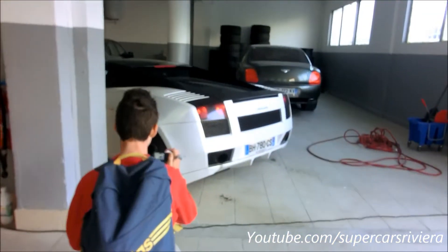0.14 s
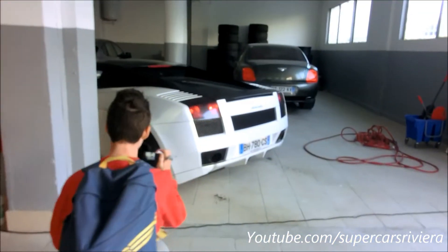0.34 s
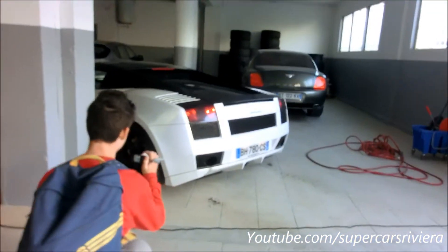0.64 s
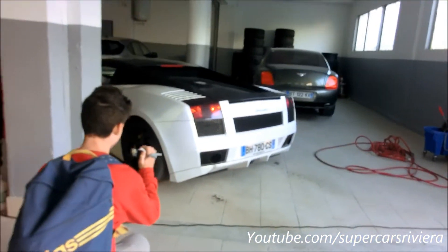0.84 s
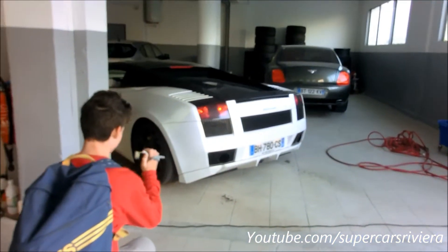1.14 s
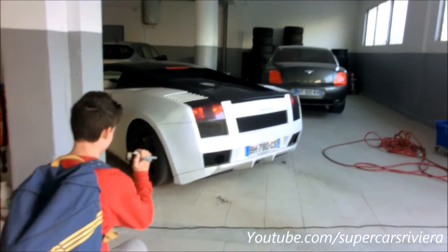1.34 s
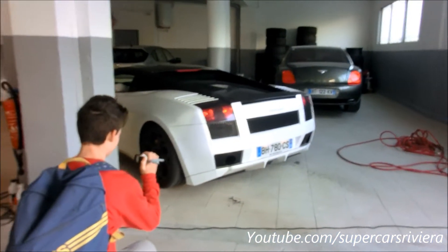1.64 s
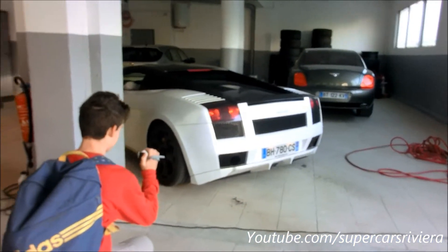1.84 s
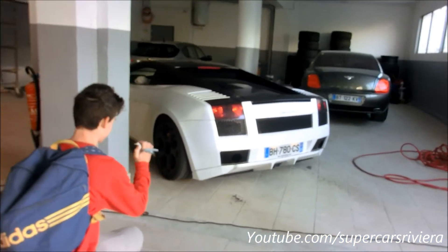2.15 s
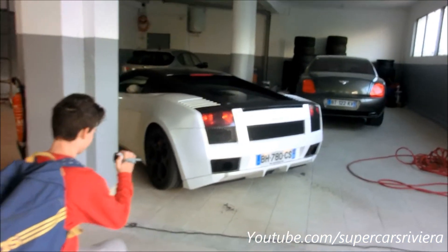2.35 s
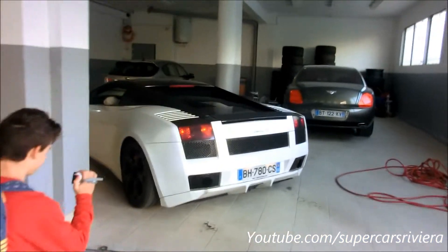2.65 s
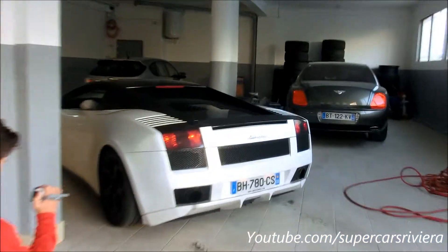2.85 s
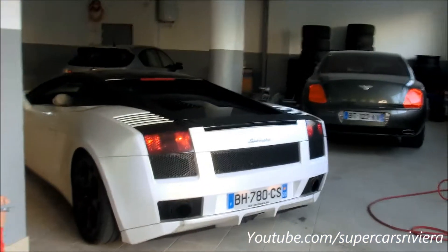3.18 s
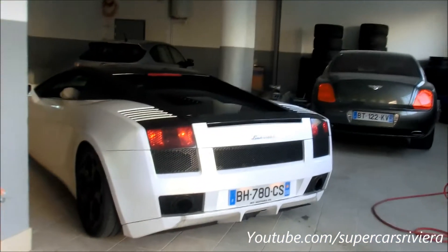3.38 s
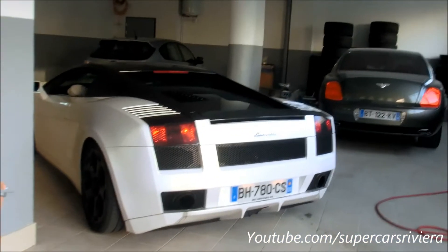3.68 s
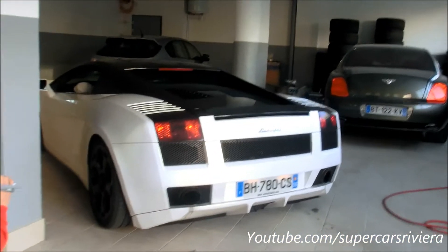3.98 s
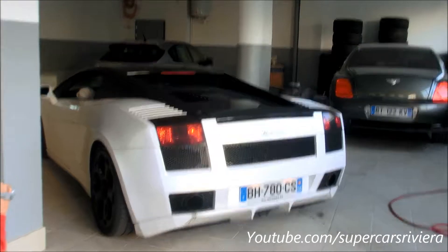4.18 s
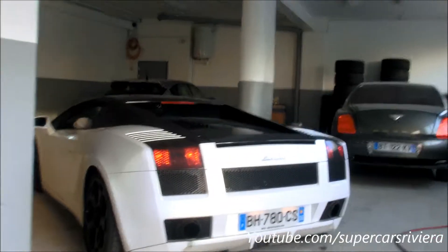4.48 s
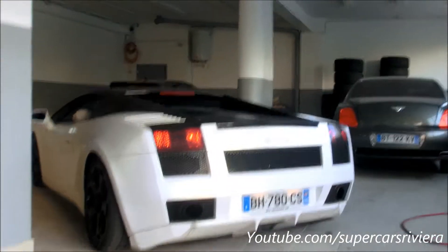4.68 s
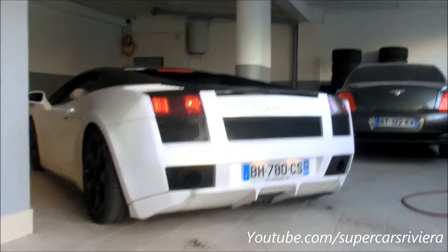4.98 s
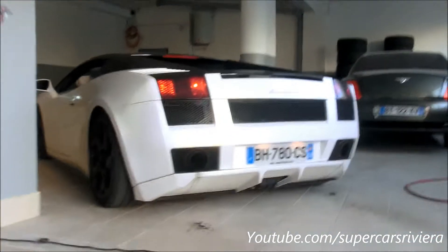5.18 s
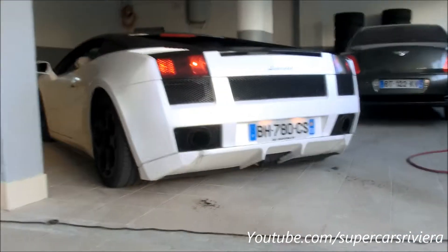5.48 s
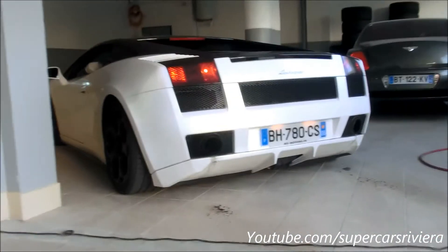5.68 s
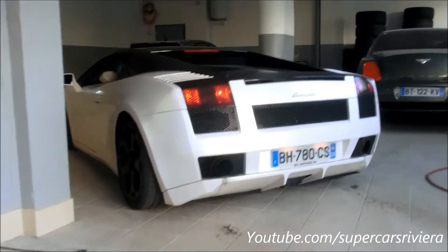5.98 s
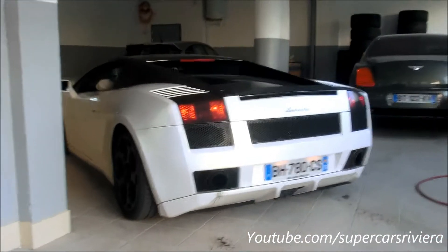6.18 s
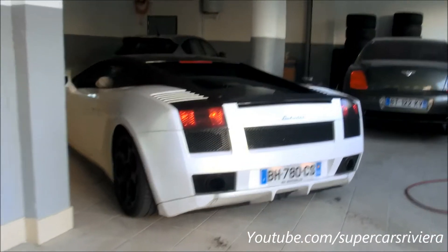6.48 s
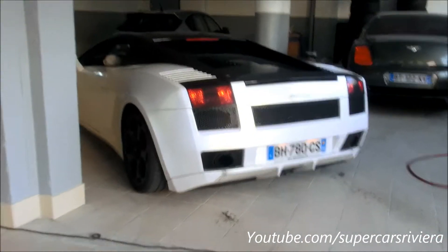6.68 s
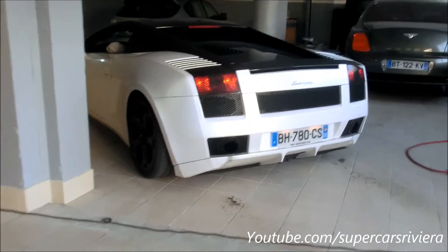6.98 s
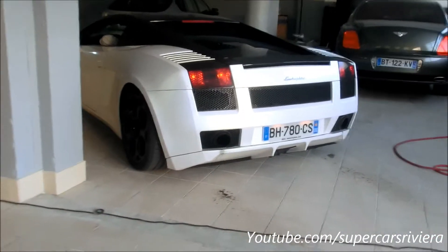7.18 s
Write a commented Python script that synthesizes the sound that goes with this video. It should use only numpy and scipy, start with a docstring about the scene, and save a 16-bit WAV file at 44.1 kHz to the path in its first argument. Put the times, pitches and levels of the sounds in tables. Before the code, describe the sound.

Deep exhaust burbles to life, drops to idle, then three throttle stabs grow louder and harsher, the last cut off high, echoing off hard walls.

```python
"""Ten-cylinder engine blipped in a tiled garage

The engine catches, flares, settles to idle and is blipped three times, popping in two places on the overrun.
Sine harmonics of the firing rate carry the exhaust note over a boom strongest near 190 Hz.
Pulsed noise makes the roar and hiss, steady noise the intake and deep rumble; tones and pops echo.
At the top of the last two blips the sound overloads the input stage, and a limiter holds it down."""
import sys
import numpy as np
from scipy import signal
from scipy.fft import rfft, irfft, next_fast_len
from scipy.io import wavfile
from scipy.ndimage import uniform_filter1d, minimum_filter1d, map_coordinates

SR = 44100
rng = np.random.default_rng(int(sys.argv[2]) if len(sys.argv) > 2 else 0)


def unload_wav(signal):
    """Save mono or channel-first audio to the path in sys.argv[1] as 16-bit WAV at rate SR, clipped to [-1, 1]."""
    wavfile.write(
        sys.argv[1],
        SR,
        np.round(np.clip(np.atleast_2d(signal).T, -1, 1) * 32767).astype(np.int16),
    )


N = 323253
IDLE_HZ = 75  # firing rate at idle


def amp(db):
    """dB to gain."""
    return 10 ** (np.asarray(db) / 20)


def unit(x):
    """Scaled to rms 1."""
    return x / np.sqrt(np.mean(x ** 2) + 1e-20)


def along(points, hz):
    """Value at hz of a curve through (Hz, value) points, on a log frequency axis."""
    f, v = np.transpose(points)
    return np.interp(np.log(hz + 1), np.log(f + 1), v)


def curve(rows):
    """One value per sample through (seconds, value) points."""
    s, values = np.transpose(rows)
    return np.interp(np.arange(N) / SR, s, values)


def wobble(rate):
    """A smooth random curve with rate knots a second."""
    knots = rng.standard_normal(int(N * rate / SR) + 4)
    return map_coordinates(knots, [np.arange(N) * rate / SR])


def lagged(x, lag_s):
    """x followed with a time constant in seconds."""
    keep = np.exp(-1 / (lag_s * SR))
    return signal.lfilter([1 - keep], [1, -keep], x - x[0]) + x[0]


def filtered(x, response):
    """x shaped by a complex response of frequency."""
    m = next_fast_len(N + SR // 2)
    return irfft(rfft(x, m) * response(np.fft.rfftfreq(m, 1 / SR)), m)[..., :N]


def spread(pair, spectrum):
    """Two signals coloured and mixed to left and right, rms 1; the treble is the widest."""
    # How much the two microphone ports differ.
    # Each row: frequency in Hz, left-minus-right over left-plus-right in dB.
    width_points = [(30, -25), (130, -29.5), (290, -24.5), (640, -20), (1410, -14.5), (3100, -8.5),
                    (6820, -4), (15000, -1.5)]

    def response(hz):
        turn = np.arctan(amp(along(width_points, hz)))
        return amp(along(spectrum, hz)) * np.array([np.cos(turn), np.sin(turn)])

    mid, side = filtered(pair, response)
    return unit(np.array([mid + side, mid - side]))


def puffs(firings, depth, scatter_db):
    """Stereo noise that swells once a firing, each puff of its own size."""
    size = amp(scatter_db * rng.standard_normal(int(firings.max()) + 2))
    shape = 1 + np.clip(depth, 0, 1) * np.cos(2 * np.pi * firings)
    return shape * np.interp(firings, np.arange(len(size)), size) * rng.standard_normal((2, N))


def law(rule, rate, throttle):
    """Level in dB that changes with engine speed above idle and with throttle."""
    idle_db, octave_db, throttle_db = rule
    octaves = np.maximum(np.log2(rate / IDLE_HZ), 0)
    return idle_db + octave_db * octaves + throttle_db * throttle


def harmonic_levels(rate, throttle):
    """Silencer response at harmonics 1-4, plus the effects of speed, throttle and a fresh start, in dB."""
    # How the exhaust passes a harmonic of the firing rate. Each row: frequency in Hz, gain in dB.
    silencer = [(38, -43.5), (75, -38), (92, -25.5), (100, -32), (114, -25), (130, -19), (142, -20),
                (154, -13.5), (165, -19), (183, -12), (196, -13), (206, -22), (240, -24), (275, -37),
                (325, -37), (370, -27.5), (410, -26), (470, -36.5), (560, -25), (640, -28), (820, -29.5)]
    # Balance of the harmonics. Each row: level at idle speed in dB, slope in dB per octave of speed,
    # rise from shut to open throttle in dB, extra level when just started in dB.
    balance = [(2.5, 0, 7.5, -1.5), (-5, 1.5, 15.5, 0), (-8.5, -4, 18, 6.5), (-16.5, -4, 21.5, 7.5)]
    settle_s = 1.47  # the start-up richness has dropped to 1/e here
    fresh = np.exp(-(np.arange(N) / SR / settle_s) ** 4)
    octaves = np.log2(rate / IDLE_HZ)
    return [along(silencer, k * rate) + db + octave_db * octaves + open_db * throttle + fresh_db * fresh
            for k, (db, octave_db, open_db, fresh_db) in enumerate(balance, 1)]


def tones(rate, firings, levels_db, roar_db):
    """Four strong firing harmonics; 5-8 sound near pipe resonances and fade unless the engine speeds up."""
    # Pipe resonances that pick out the higher harmonics.
    # Each row: centre in Hz, width in Hz, relative strength in dB.
    resonances = [(340.3, 148, 3), (571, 69, 5), (800, 82, -8)]

    def pipe(f):
        return sum(amp(db) / (1 + (2 * (f - hz) / width) ** 2) for hz, width, db in resonances)

    climb = uniform_filter1d(np.gradient(np.log(rate)) * SR, size=SR // 8)
    load_db = 12 * np.clip(4 * climb - .4, -1, 0)
    low = sum(amp(db + 0.76 * wobble(10)) * np.sin(2 * np.pi * k * firings + k)
              for k, db in enumerate(levels_db, 1))
    high = sum(pipe(k * rate) * amp(3 * wobble(16)) * np.sin(2 * np.pi * k * firings + 1.1 * wobble(20))
               for k in range(5, 9))
    return np.sqrt(2) * (low + amp(roar_db - 10 + load_db) * high)


def boom(firings):
    """Unequal cylinders and chance make every firing differ; the difference rings the silencer."""
    # Relative kick of each of the ten cylinders in firing order (no unit).
    cylinder_kicks = [-0.32, -2.85, -0.15, -1.4, -0.32, -1.17, 0.84, -1.25, -1.2, -0.21]
    # Colour of the boom. Each row: frequency in Hz, relative level in dB per Hz.
    colour = [(41, -46), (70, -34), (91, -10.5), (118, -4.5), (140, -1.5), (189, 2), (208, -2), (253, -9.5),
              (275, -43.5), (320, -40), (420, -43), (700, -120)]
    beats = np.flatnonzero(np.diff(np.floor(firings)))
    kicks = np.zeros(N)
    kicks[beats] = 0.73 * np.resize(cylinder_kicks, len(beats)) + 0.58 * rng.standard_normal(len(beats))
    noise = rng.standard_normal((2, N))
    return spread([unit(kicks) + 1.5 * noise[0], noise[1]], colour)


def roar(rate, firings):
    """Exhaust gas noise in puffs; its colour opens up as the engine speeds."""
    # Colours at low and at high speed. Each row: frequency in Hz, relative level in dB per Hz.
    slow_colour = [(160, -34), (270, -21.5), (309, 4), (376, 0.5), (444, -10), (534, 4), (575, -11.5),
                   (644, -9), (707, -7.5), (768, -11.5), (994, -10.5), (1600, -20), (2140, -22),
                   (2600, -54), (3200, -40), (4160, -65), (7040, -120)]
    fast_colour = [(150, -10.5), (260, 1.5), (321, -11), (372, -1), (483, -14), (572, 2.5), (676, -14),
                   (759, -7), (870, -15.5), (997, -9), (1340, -19.5), (1570, -18), (1740, -24.5),
                   (1930, -22), (3200, -57), (4160, -89), (7040, -120)]
    fast = np.clip((rate - 85) / 40, 0, 1)
    slow_gas = spread(puffs(firings, depth=0.1, scatter_db=.8), slow_colour)
    fast_gas = spread(puffs(firings, depth=0.2, scatter_db=.3), fast_colour)
    return np.sqrt(1 - fast) * slow_gas + np.sqrt(fast) * fast_gas


def hiss(firings):
    """Treble gas noise, pulsing faintly with each firing."""
    # Colour of the hiss. Each row: frequency in Hz, relative level in dB per Hz.
    colour = [(1180, -10.5), (2000, -12.5), (2280, -6), (2480, -2), (2820, -6), (3440, -8), (4370, -10),
              (5100, -15), (7840, -12.5), (11000, -14.5), (14400, -20.5), (15600, -29)]
    return spread(puffs(firings, depth=0.072, scatter_db=.5), colour)


def intake(level_db):
    """Smooth air noise in one broad duct resonance."""
    # The duct: centre in Hz, width in Hz.
    hz, width = (4400, 2700)

    def duct(f):
        return (1j * f * width / (hz * hz - f * f + 1j * f * width)) ** 2

    air = spread(rng.standard_normal((2, N)), [(20, 0)])
    return amp(level_db) * unit(filtered(air, duct))


def pops():
    """A short crack, a duller thump and a brief ring of the tail pipes for each pop."""
    # Pops on the overrun. Each row: start in seconds, level in dB, thump over crack in dB before its filter.
    pop_rows = [(4.0715, -36, 19), (5.9986, -55.5, 28), (6.0058, -30, 21), (6.03, -30, 19)]
    # What a pop rings in the tail pipes.
    # Each row: frequency in Hz, relative level in dB before a random offset, t60 in seconds.
    tail_pipes = [(583, 0, .06), (800, -3, .05), (1500, -10, .05), (2700, -17, .06), (3150, -18, .08),
                  (3450, -18, .1), (3620, -19, .08)]
    out, t = np.zeros(N + SR), np.arange(SR // 5) / SR
    dull = signal.butter(2, [250, 1400], "band", fs=SR, output="sos")
    for s, db, thump_db in pop_rows:
        crack = amp(-60 * t / .1) * rng.standard_normal(len(t))
        thump = amp(thump_db - 60 * t / .09) * signal.sosfilt(dull, rng.standard_normal(len(t)))
        ring = sum(amp(level + rng.normal(0, 2) - 60 * t / t60) * np.sin(2 * np.pi * hz * t)
                   for hz, level, t60 in tail_pipes)
        onset = 1 - np.exp(-t / 0.0022)
        out[round(s * SR):][:len(t)] += amp(db) * onset * (crack + thump + amp(9.0) * ring)
    return filtered(out[:N], lambda hz: 1 / (1 + 1j * hz / 5000))  # softens the treble


def rumble():
    """Deep noise under the loping idle."""
    # Colour of the rumble. Each row: frequency in Hz, relative level in dB per Hz.
    colour = [(12, -48), (20, -19), (43, -4), (70, -14), (75, -15), (98, -34), (160, -120)]
    return spread(rng.standard_normal((2, N)), colour)


def garage(x):
    """Each frequency of the echo dies at its own speed; long waves reach both ports alike."""
    # Decay of the tiled room. Each row: frequency in Hz, t60 in seconds.
    decay = [(100, 0.97), (1000, 0.95), (10000, 0.86)]
    hz, t, z = signal.stft(rng.standard_normal((2, SR)), SR, nperseg=256)
    tail = signal.istft(z * amp(-60 * t / along(decay, hz)[:, None]), SR, nperseg=256)[1]
    late = np.pad(x, (600, 0))[None]  # the echo starts 600 samples late
    wet = signal.fftconvolve(late, tail / np.linalg.norm(tail[0]), axes=1)[:, :N]
    return spread(wet, [(20, 0)]) * np.sqrt(np.mean(x ** 2))


def scene():
    """Exhaust tones, boom, roar, hiss, intake, rumble and pops in the garage."""
    # Engine speed. Each row: time in seconds, firings per second.
    rate = curve([(0.0, 38.9), (0.22, 42.2), (0.41, 52), (0.63, 63.7), (0.77, 74.8), (0.94, 80),
                  (1.2, 92.2), (1.33, 95.5), (1.6, 98.3), (1.9, 100.5), (2.06, 92.7), (2.33, 77.9),
                  (2.49, 74.9), (2.74, 78.6), (2.94, 97.7), (3.18, 126.6), (3.32, 150), (3.5, 163),
                  (3.63, 133), (3.82, 99.3), (4.1, 81.8), (4.2, 74.2), (4.33, 76.9), (4.58, 106),
                  (4.76, 147.2), (4.88, 176), (5.0, 197.8), (5.1, 209), (5.2, 187.4), (5.37, 159.8),
                  (5.59, 113.8), (5.78, 88.9), (5.92, 84.8), (6.06, 71.7), (6.3, 73.5), (6.47, 87.9),
                  (6.66, 116.7), (6.8, 146.4), (6.92, 167.6), (7.04, 182.1), (7.21, 198.4), (7.33, 193.8)])
    # Throttle pedal. Each row: time in seconds, opening from 0 to 1.
    throttle = curve([(0.0, 0.1), (0.25, 0.41), (0.45, 0.63), (0.62, 0.06), (0.95, 0.58), (1.1, 0.6),
                      (1.42, 0.6), (1.5, 0.23), (1.68, 0.1), (1.85, .05), (2.1, 0.21), (2.3, 0.02),
                      (2.5, 0.15), (2.78, 0.18), (2.87, 0.61), (3.04, 0.72), (3.2, .9), (3.35, 0.49),
                      (3.57, 0.36), (3.72, 0.19), (4.2, 0.04), (4.33, 0.3), (4.45, 0.67), (4.56, 0.83),
                      (4.76, 0.85), (5.07, 1), (5.2, 0.74), (5.47, 0.53), (5.6, 0.43), (6.06, 0.06),
                      (6.31, 0.3), (6.46, .85), (6.58, 0.87), (6.72, 1), (6.85, 0.92), (7.05, .9),
                      (7.2, 0.69), (7.33, .8)])
    # Swell of tones and gas at the top of the last two blips.
    # Each row: time in seconds, gain of the tones in dB.
    swell_db = curve([(0, 1), (4.68, 0.5), (4.78, 12), (5.0, 14), (5.2, 15.5), (5.46, 4.5), (5.51, 1.5),
                      (6.9, -1), (7.0, 14), (7.1, 20), (7.33, 13.5)])
    # Treble hiss. Each row: time in seconds, level before the swell in dB.
    hiss_db = curve([(0.0, -48), (0.45, -44.5), (0.53, -47), (0.6, -49.5), (1.02, -48.5), (1.1, -45.5),
                     (1.2, -48), (2.3, -50), (2.6, -53.5), (3.0, -53.5), (3.15, -48), (3.2, -42),
                     (3.5, -42.5), (4.0, -50), (4.33, -51.5), (4.7, -39.5), (4.8, -41), (5.03, -33),
                     (5.3, -39.5), (5.95, -51), (6.32, -50), (6.66, -38.5), (6.95, -34), (7.08, -34.5),
                     (7.16, -37.5), (7.33, -36.5)])
    # Deep rumble. Each row: time in seconds, level in dB.
    rumble_db = curve([(0.0, -36), (0.4, -23), (1.0, -47), (1.43, -51), (1.63, -32.5), (2.7, -31),
                       (3.3, -47), (4.1, -25), (5.2, -36.5), (5.82, -36), (6.04, -24.5), (6.7, -31),
                       (7.33, -46.5)])
    # Level laws before the swell; the intake's counts from the hiss level.
    # Each row: level at idle in dB, change in dB per octave of speed, rise from shut to open throttle in dB.
    boom_law = (-20.5, -6, 5.5)
    intake_law = (-11, 2.32, 8.3)
    roar_law = (-39, 10.9, 13.8)

    boom_db, intake_db = law(boom_law, rate, throttle), law(intake_law, rate, throttle)
    # the roar follows the throttle late
    roar_db = law(roar_law, rate, lagged(throttle, lag_s=0.079))
    # running count of firings, slightly uneven in time
    firings = np.cumsum(rate) / SR + 0.029 * wobble(12)

    direct = amp(swell_db) * tones(rate, firings, harmonic_levels(rate, throttle), roar_db)
    gas = amp(boom_db + 1.54 * wobble(6)) * boom(firings)
    gas = gas + amp(roar_db + 0.5 * wobble(14)) * roar(rate, firings)
    gas = gas + amp(hiss_db + 0.9 * wobble(12)) * hiss(firings)
    gas = gas + intake(hiss_db + intake_db + 0.6 * wobble(8.3))
    deep = amp(rumble_db + 1.1 * wobble(2.8)) * rumble()
    cracks = pops()
    # the swell lifts the firing tones more than the gas noise
    near = direct + amp(0.73 * swell_db) * gas + deep + cracks
    echo = amp(-11) * garage(direct) + amp(-5) * garage(cracks)
    return (near + echo) * amp([[-.15], [.15]])  # right a touch louder


def record(dry):
    """The input stage clips, a bass cut tilts the flat tops, a limiter holds the level and shaves what is left."""
    top = 1.5  # clipping level of the stage
    # part of the treble leaks past the overloaded stage
    leak = .45 * filtered(dry, lambda hz: (1j * hz / (1200 + 1j * hz)) ** 2)
    body = dry - leak
    # the stage clips one side earlier, which makes even harmonics
    clipped = leak + body / (1 + np.abs((body + .14) / top) ** 10) ** (1 / 10)
    tilted = 0.89 * filtered(clipped, lambda hz: 1j * hz / (100 + 1j * hz))

    peaks = -minimum_filter1d(-np.abs(tilted).max(axis=0), size=SR // 100)
    quick = uniform_filter1d(np.minimum(1, .95 / (peaks + 1e-9)), size=SR // 100)
    slow = np.minimum(1, .95 / (uniform_filter1d(peaks, size=SR // 10) + 1e-9))
    held = tilted * np.minimum(slow, quick)

    # a lasting overload pulls the shaving ceiling down
    pressed = -minimum_filter1d(-np.clip((1 - slow) / .12, 0, 1), size=SR // 8)
    lasting = uniform_filter1d(pressed, size=SR // 20)
    ceiling = 1.3 - .52 * lasting
    shaved = held / (1 + np.abs(held / ceiling) ** 12) ** (1 / 12)
    return filtered(shaved, lambda hz: hz < 15740)  # nothing passes above this


dry = scene()
out = record(dry)
unload_wav(out)
```